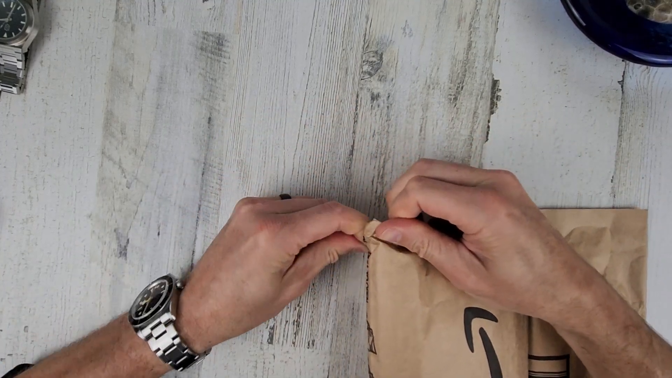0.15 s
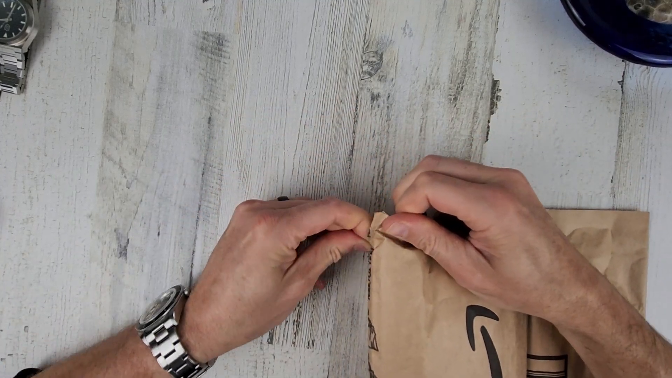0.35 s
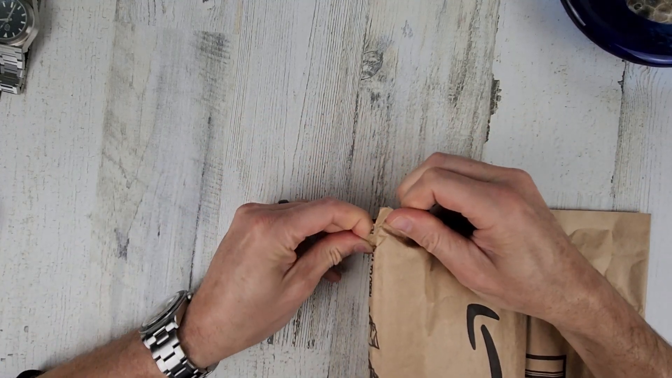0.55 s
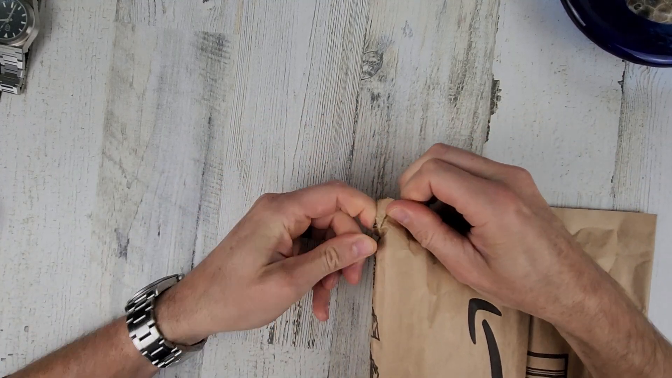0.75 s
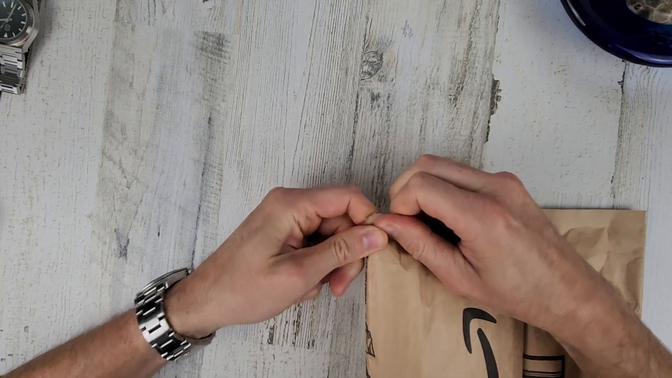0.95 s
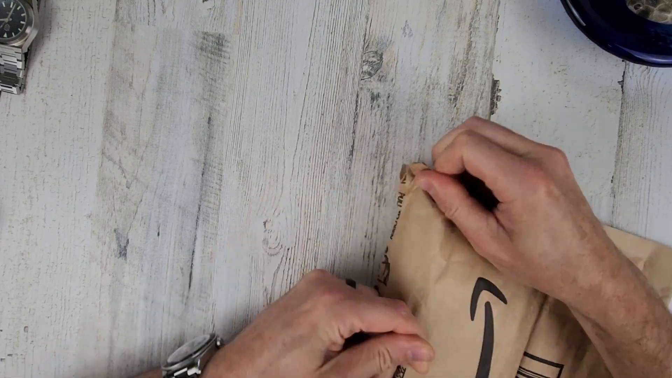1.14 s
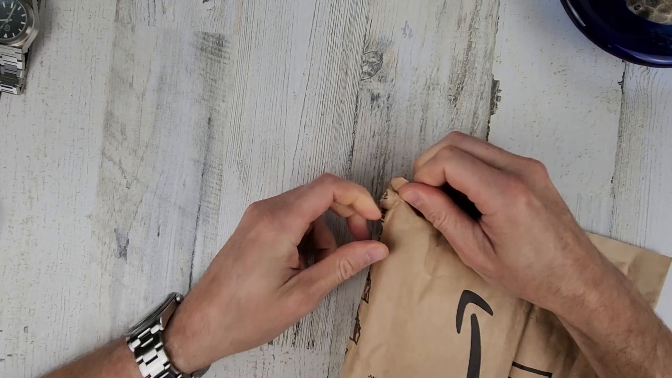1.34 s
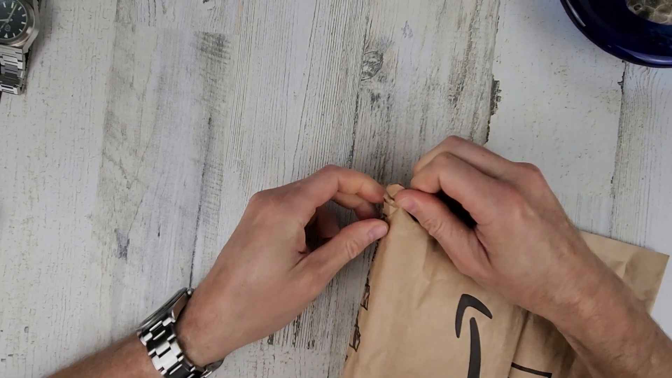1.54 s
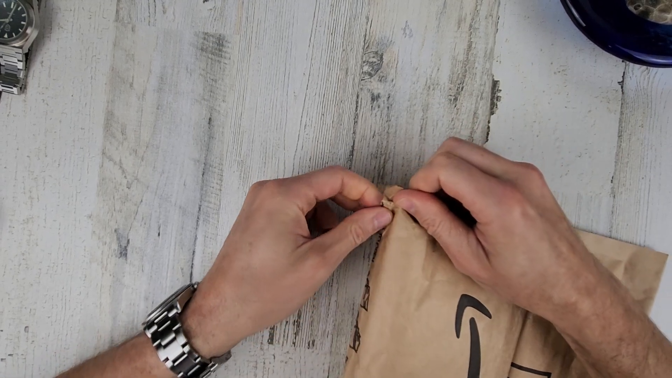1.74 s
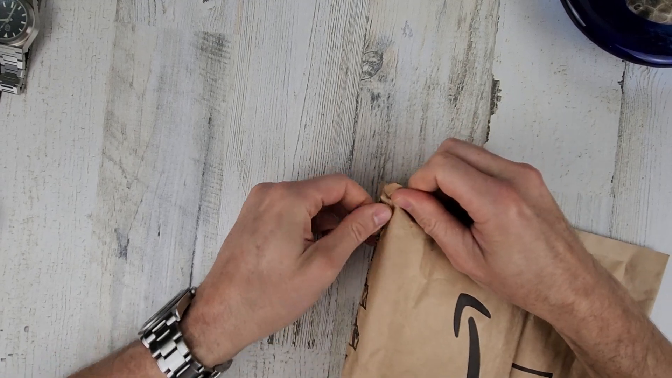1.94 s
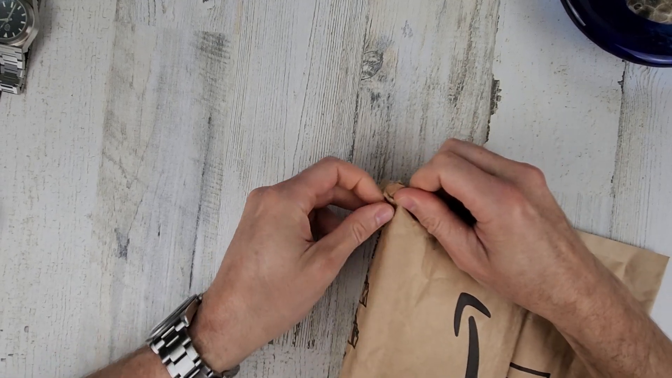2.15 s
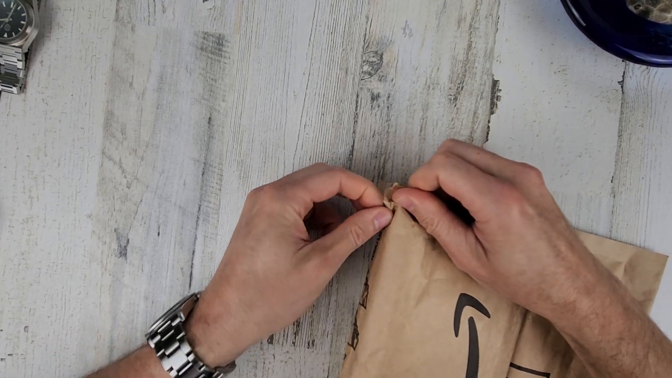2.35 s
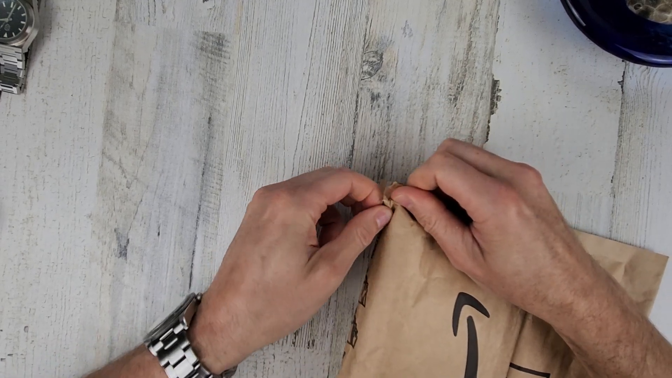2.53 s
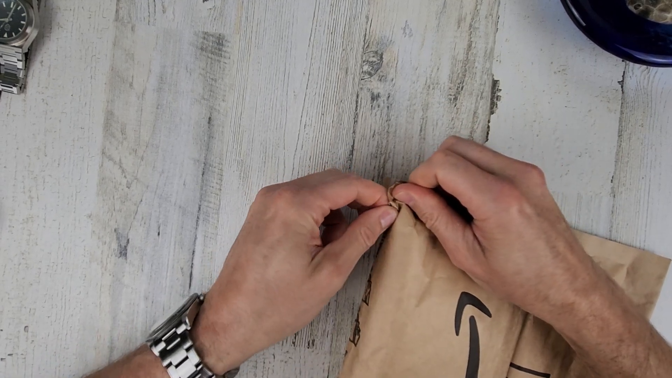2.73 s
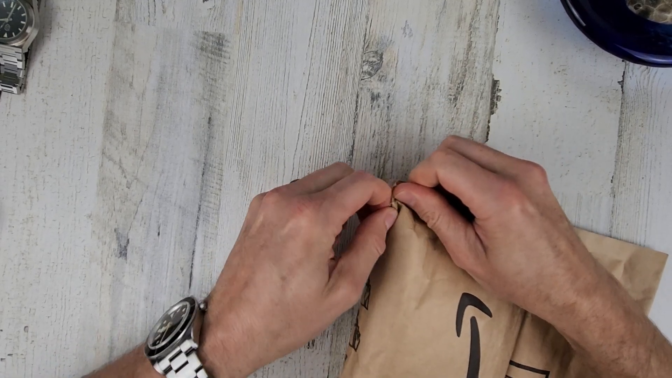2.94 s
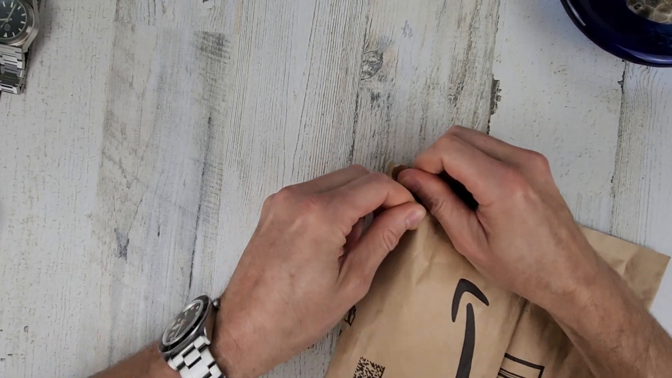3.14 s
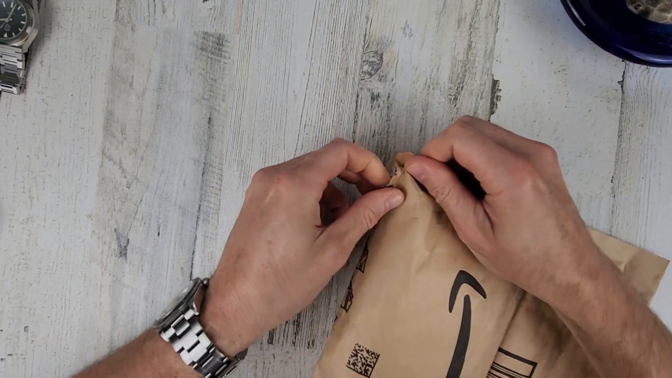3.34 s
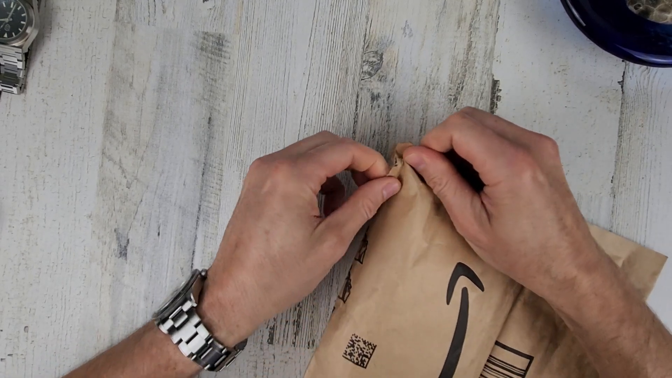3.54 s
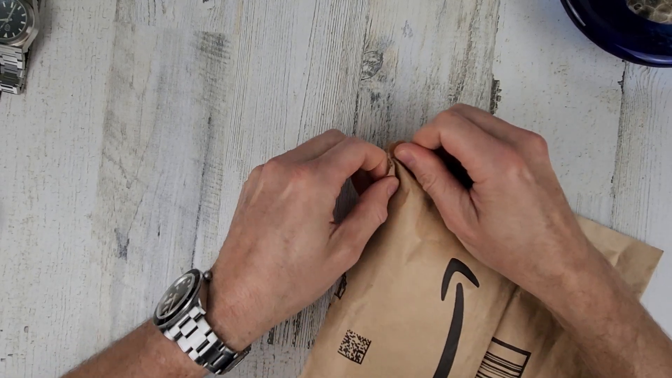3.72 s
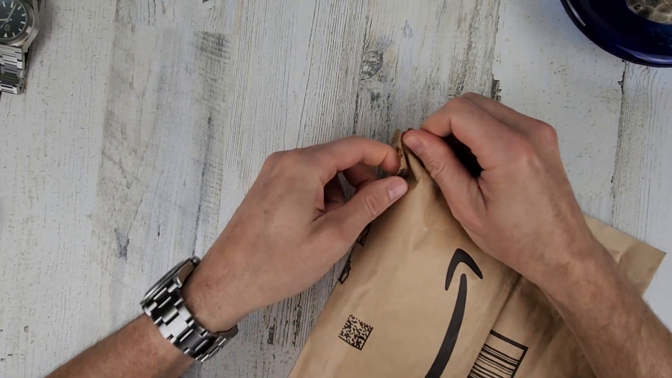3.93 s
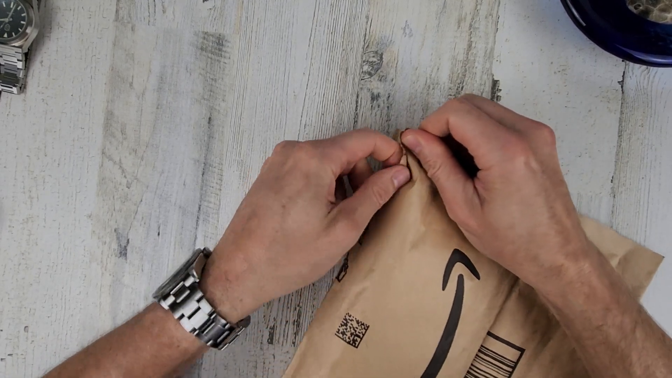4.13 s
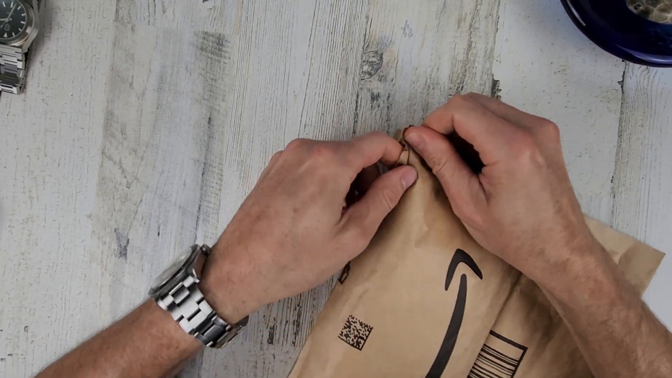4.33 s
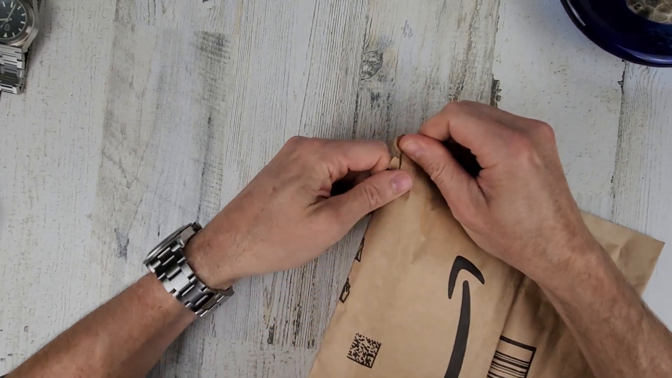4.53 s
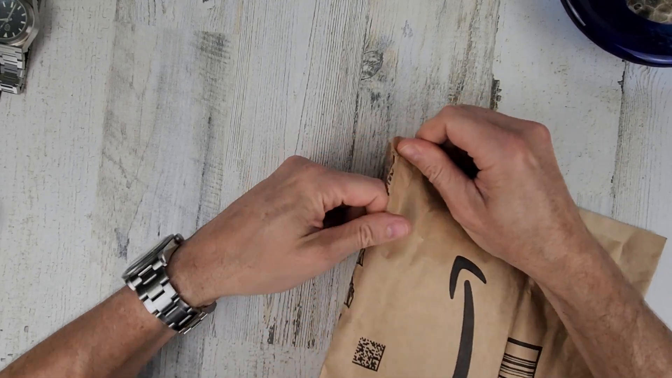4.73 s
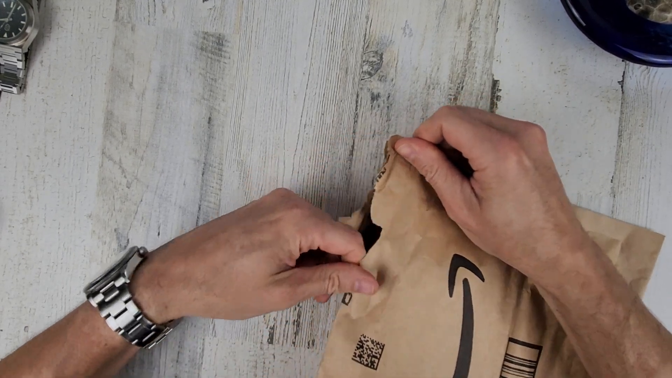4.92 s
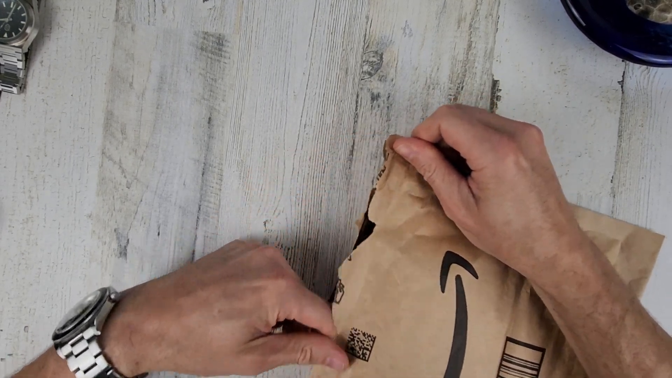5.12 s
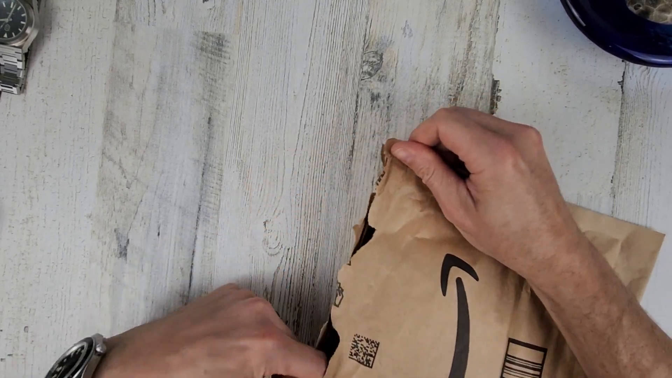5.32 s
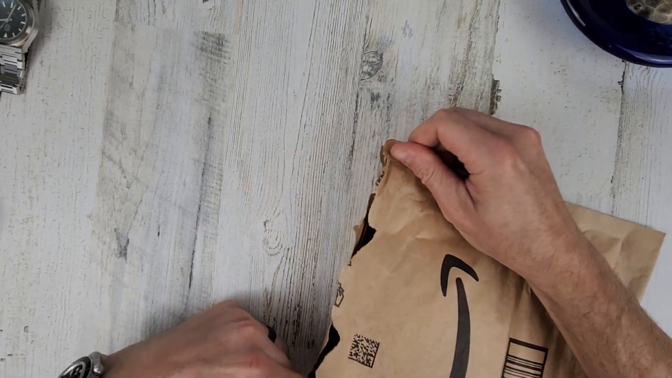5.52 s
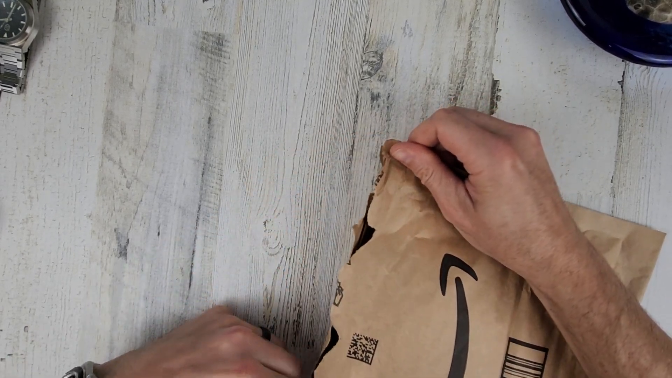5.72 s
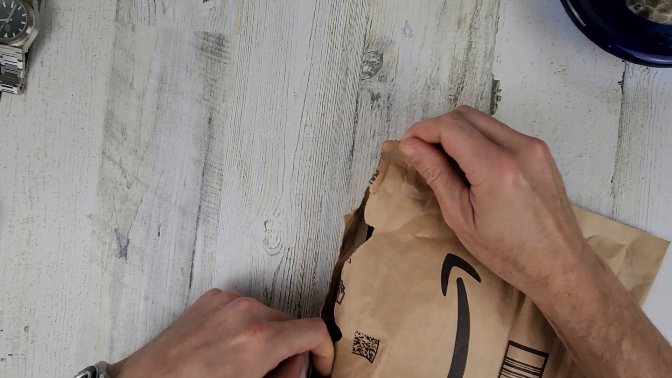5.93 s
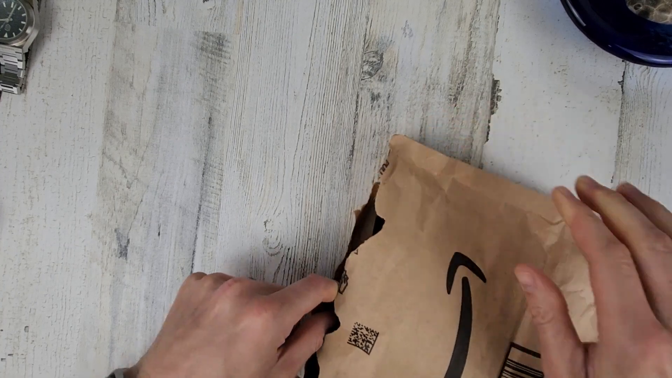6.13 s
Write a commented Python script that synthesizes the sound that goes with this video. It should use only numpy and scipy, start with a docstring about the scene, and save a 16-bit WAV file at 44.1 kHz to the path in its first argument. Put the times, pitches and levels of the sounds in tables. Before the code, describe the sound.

A quiet indoor room with barely audible air noise; close stereo microphone over a table. From 0 to 1 s, fingers softly rub a stiff padded paper mailer, with faint hiss, tiny crinkles and a small tick near 0.5 s. At about 1.06 s a loud, sharp rip bursts out with a low, short table bump, followed to 1.25 s by several bright, hollow pops. From 1.3 to 3 s there is light rustling, with single snaps near 1.45 and 1.96 s and a small flurry to 2.1 s. Near 3.0 s comes a brief tear and soft thud, then rubbing and crisp snaps at 3.34, 3.64 and 4.43 s. From 4.6 to 5.65 s rapid crackling tears and snaps crowd together, strongest around 4.84 and 5.13 s, with dull bumps beneath. They thin out into rustling, and a few last snaps sound around 6 s.

```python
"""In a quiet room, fingers rustle, rub and rip a padded paper mailer: random clicks shaped into hiss and crackle.
Soon taut panels snap over: each is a short ringing tone, a crack of noise and a softer burst of creases.
After a second the bag bumps the table, heard as low fading tones, and longer tears run along its edge.
Rubs, rips, tears and snaps then mix until the end; the hollow bag and a small room ring on after the paper."""
import sys
import numpy as np
from scipy import signal
from scipy.fft import rfft, irfft
from scipy.io import wavfile
from scipy.ndimage import uniform_filter1d

SR = 44100
rng = np.random.default_rng(int(sys.argv[2]) if len(sys.argv) > 2 else 0)


def master(y):
    """Save y as 16-bit WAV."""
    cut = np.clip(np.atleast_2d(y).T, -1, 1)
    pcm = np.round(cut * 32767)  # scale
    wavfile.write(sys.argv[1], SR, pcm.astype(np.int16))


N = 272097
T = np.arange(N) / SR

# steady background of the still room: pitch_hz, relative_level_db (per Hz)
AIR_SPECTRUM = [(20, -3.5), (55, 2.5), (110, -8.5), (250, -10.5), (600, -22), (1200, -11), (3000, -45),
                (8000, -18), (16000, -32)]
# fingers slide over the paper: middle_s, length_s, relative_hiss_db, sheet_over_hiss_db
RUBS = [(0.055, 0.063, -55.5, -2), (0.186, 0.11, -50.5, -1.5), (0.295, 0.08, -51.5, -2.5),
        (0.447, 0.18, -53, -20), (0.683, .12, -48, 2), (0.836, 0.21, -48, -2.5), (0.981, 0.14, -41.5, -5),
        (1.275, 0.23, -44, -3), (1.483, 0.037, -41, -0.5), (1.6, 0.13, -48, -5), (1.673, 0.042, -47, 1),
        (1.791, 0.054, -49, -0.5), (1.97, 0.086, -38.5, -1.5), (2.087, 0.087, -34.5, -4),
        (2.16, .11, -43, -2), (2.327, 0.1, -48.5, 1), (2.473, 0.18, -63, 1.5), (2.612, .1, -46, 1),
        (2.76, 0.054, -57, 1.5), (2.975, .1, -48.5, -1.5), (3.105, 0.099, -38, -1), (3.23, .1, -39, -6),
        (3.342, 0.17, -47, 0), (3.522, .07, -63.5, 8.5), (3.654, 0.068, -47.5, 2), (3.83, 0.24, -51, 2),
        (4.055, 0.069, -42, -6.5), (4.175, 0.066, -37, -3), (4.263, 0.28, -45.5, -3),
        (4.409, 0.1, -38.5, -0.5), (4.539, 0.094, -38.5, -2.5), (4.777, 0.14, -44, 4.5),
        (5.51, 0.31, -42.5, -8.5), (5.917, 0.14, -35, 0.5), (6.026, 0.15, -39, -4.5)]
# runs of fibres give way at once: peak_s, relative_hiss_db, rise_s, fall_s, sheet_over_hiss_db
RIPS = [(.026, -46.5, .002, 0.0046, -13), (.532, -33, .0007, 0.024, -8), (1.063, -8.5, .0034, 0.0038, -8),
        (1.082, -23, 0.011, 0.0083, -3), (1.2434, -16.5, 0.00057, .0045, -1.5),
        (1.964, -26.5, .0032, .0076, -4.5), (2.87, -42.5, .001, 0.0064, -22),
        (4.408, -27.5, .0036, 0.0024, 5), (4.52, -27, .004, .013, -2.5), (4.615, -15, 0.01, 0.013, -3.5),
        (4.843, -18.5, .005, 0.012, 2.5), (4.875, -21, .004, .0044, -4), (4.965, -23, .004, 0.0061, -7),
        (5.105, -19, .003, .014, -2), (5.128, -9.5, 0.0026, 0.0049, -4.5), (5.26, -22.5, .0013, 0.0056, -8),
        (5.363, -16.5, 0.0049, 0.015, -4), (5.467, -23, .005, .014, -16), (5.637, -21, .0007, .005, -4),
        (5.79, -27.5, 0.0019, 0.0043, -3), (6.021, -21, .0025, .007, -5)]
# hiss of the fibres themselves: pitch_hz, relative_level_db (per Hz)
FIBRE_SPECTRUM = [(500, -24), (1500, -6.5), (2600, -1), (4000, -0.5), (5200, 3), (6600, -1), (8000, 1),
                  (10000, -4.5), (11300, -3), (12300, -0.5), (14000, -2), (16000, -4)]
# sound of the sheet shaken by its fibres: pitch_hz, relative_level_db (per Hz)
SHEET_SPECTRUM = [(100, -22), (260, -12), (480, -12.5), (590, -4.5), (800, -5), (1100, -2), (1400, -1.5),
                  (2200, -4.5), (3000, -8), (6000, -18), (16000, -70)]
# resonances of the hollow bag: pitch_hz, width_hz, relative_level_db
BAG_RESONANCES = [(413, 43, 0.5), (590, 59, 0.5), (780, 115, -4.5), (1100, 220, -3), (1576, 14, -4.5),
                  (2250, 70, -2), (3060, 96, -21), (3670, 75, -19)]
# panels that buckle: start_s, relative_level_db, pitch_hz, relative_crack_db
BUCKLES = [(.277, -42.5, 1100, -10), (.291, -37, 1240, -15), (.507, -45, 443, -17), (.529, -39, 1350, -5),
           (.647, -39, 1100, -12), (.6655, -32.5, 1370, -26), (.7, -41.5, 1390, -13),
           (.791, -31.5, 2190, -4), (0.9605, -36.5, 2220, -11), (1.1305, -24, 1810, -6),
           (1.1402, -14, 700, -3.5), (1.152, -18.5, 1840, -20), (1.1858, -23, 724, -18),
           (1.221, -28, 1450, -17), (1.2432, -23.5, 710, -8), (1.2439, -17.5, 2750, -6),
           (1.37, -38, 1100, -6.5), (1.4484, -18.5, 756, -20), (1.9637, -19.5, 594, -13),
           (2.0184, -24, 1540, -17), (2.0472, -25.5, 900, -15), (2.0861, -25.5, 965, -20),
           (2.103, -25.5, 1550, -1), (2.639, -40, 1390, -2.5), (3.024, -30.5, 554, -10),
           (3.087, -22.5, 880, -11), (3.2684, -34, 1070, -8.5), (3.3421, -22.5, 1480, -7.5),
           (3.6398, -16.5, 1006, -10.5), (3.8474, -41, 1050, -16), (3.96, -35, 1036, -28),
           (4.1886, -30.5, 950, 0.5), (4.3239, -37, 4370, 0.5), (4.389, -31, 1740, -4.5),
           (4.4286, -15, 1450, -5), (4.5568, -30, 1090, -2.5), (4.7735, -34, 1870, -26),
           (4.7903, -30, 2190, -10), (4.807, -26.5, 1370, -20), (4.8405, -14.5, 1850, -3),
           (4.8915, -23, 2110, -14), (4.908, -19.5, 2130, -3), (4.9732, -19, 2230, -5.5),
           (5.001, -19, 2150, -22), (5.0535, -25, 950, -12), (5.1275, -11.5, 900, -14),
           (5.136, -17, 1060, -22), (5.154, -17, 1070, -23), (5.2236, -29.5, 1140, -5),
           (5.3269, -16.5, 1054, 0), (5.3635, -14, 1074, -27), (5.4645, -24, 1120, -12),
           (5.5083, -30, 1170, -6), (5.5326, -30, 1090, -10.5), (5.6355, -26, 1610, -14),
           (5.788, -30, 1770, -8), (5.952, -24.5, 1770, -4), (5.9678, -24.5, 1560, -12),
           (6.0193, -25, 1970, 1)]
# the bag bumps on the table: start_s, relative_level_db, reach_hz (modes well above it are hardly stirred)
BUMPS = [(1.057, -25, 120), (1.089, -27, 100), (1.128, -31, 130), (1.234, -43, 89), (1.319, -43, 70),
         (1.52, -46.5, 60), (1.963, -47, 80), (3.017, -32.5, 320), (4.518, -41, 80), (4.612, -39, 130),
         (4.668, -39, 90), (5.12, -28, 110), (5.353, -31.5, 101), (5.584, -43, 100), (5.909, -43, 90),
         (6.029, -36, 110)]
# modes of the table top: pitch_hz, weight (plain gain), decay_s (time to fall to 1/e)
TABLE_MODES = [(56.6, 0.35, 0.046), (91.5, 1.0, 0.022), (129.4, 0.86, 0.018), (159, .8, 0.017),
               (235, 0.24, .009)]
# the edge tears along: start_s, length_s, relative_hiss_db, sheet_over_hiss_db
TEARS = [(1.059, 0.14, -27, -2.5), (3.01, 0.017, -30.5, -5), (4.596, 0.068, -24, 0.5),
         (4.837, 0.12, -22.5, -3.5), (4.96, 0.069, -21.5, -3), (5.047, 0.024, -34, -2.5),
         (5.101, .07, -21, -3), (5.233, 0.071, -27.5, -5.5), (5.433, 0.059, -27.5, -5.5),
         (5.584, .04, -31, -2)]

HOLD_DB, HOLD_SHEET_DB = -69, 6  # faint rustle of holding: relative hiss, and sheet over hiss
RUB_STEEPNESS = 1.96  # how abruptly a slide starts and stops; 2 is a bell
GRIP_DB, GRIP_PER_S = 2.04, 55  # the grip catches and slips: rms depth and new random values per second
RING_CYCLES = 1.16  # cycles a panel takes to fall to 1/e when its relative crack is 0 dB
RING_HALVED_DB = 25  # each such step of harder crack halves those cycles
TEAR_ATTACK_S, TEAR_RELEASE_S = 0.0069, 0.018
TEAR_SAG_DB_PER_S = 42  # the tension eases as the tear runs
TOP_HZ = 15950  # upper edge of the microphone's sound


def undb(db):
    """Turn decibels into a plain gain."""
    return 10 ** (np.asarray(db) / 20)


def unit(x):
    """Scale to an rms of 1."""
    return x / np.sqrt(np.mean(x ** 2))


def add(track, start_s, sound):
    """Mix a sound into a track at a given time."""
    i = max(int(start_s * SR), 0)
    track[..., i:i + sound.shape[-1]] += sound[..., :N - i]


def convolve(x, response):
    """Let every sample of a sound start its own copy of a response."""
    full = signal.fftconvolve(np.atleast_2d(x), np.atleast_2d(response), axes=-1)
    return full[:, :x.shape[-1]]


def colour(x, points, size=2048):
    """Shape the spectrum along (Hz, dB) points with a filter of unit power that never acts ahead of time."""
    hz, db = np.transpose(points)
    grid_hz = np.fft.rfftfreq(size, 1 / SR)
    gain = undb(np.interp(np.log(grid_hz + 1), np.log(hz), db))
    # folding the cepstrum puts all of the response after time zero
    cepstrum = irfft(np.log(gain))[:size // 2]
    cepstrum[1:] *= 2
    response = irfft(np.exp(rfft(cepstrum, size)))
    return convolve(x, response / np.linalg.norm(response))


def band(x, lo_hz, hi_hz):
    """Keep a band of pitches, with gentle edges."""
    edges = [lo_hz, min(hi_hz, SR / 2 - 1)]
    return signal.sosfilt(signal.butter(2, edges, "band", fs=SR, output="sos"), x)


def walk(rate):
    """Wander smoothly between random values, with an rms of 1."""
    size = int(SR / rate)
    steps = np.repeat(rng.standard_normal(N // size + 1), size)[:N]
    return unit(uniform_filter1d(steps, size))


def still_air():
    """The quiet room gives a steady noise, partly shared by both ears."""
    shared = rng.standard_normal(N)
    separate = rng.standard_normal((2, N))
    return colour(shared + 0.54 * separate, AIR_SPECTRUM)


def rub_strokes():
    """Sliding fingers make the friction swell and fade around a middle time."""
    strokes = []
    for middle, length, db, sheet_db in RUBS:
        distance = np.minimum(abs(2 * (T - middle) / length), 10)
        strokes.append((np.exp(-distance ** RUB_STEEPNESS), db, sheet_db))
    return strokes


def rip_strokes():
    """A run of fibres gives way at once, so the level bursts up and dies away."""
    strokes = []
    for peak, db, rise, fall, sheet_db in RIPS:
        fade = np.maximum((peak - T) / rise, (T - peak) / fall)
        strokes.append((np.exp(-np.minimum(fade, 20)), db, sheet_db))
    return strokes


def handling():
    """Holding, rubs, rips and tears add their power, giving the levels of fibre hiss and sheet body."""
    hold = [(1, HOLD_DB, HOLD_SHEET_DB)]
    strokes = hold + rub_strokes() + rip_strokes() + tear_strokes()
    hiss_power = sum((shape * undb(db)) ** 2 for shape, db, _ in strokes)
    body_power = sum((shape * undb(db + sheet_db)) ** 2 for shape, db, sheet_db in strokes)
    grip = undb(GRIP_DB * walk(GRIP_PER_S))
    return grip * np.sqrt(hiss_power), grip * np.sqrt(body_power)


def clicks(rate, spread_db, width):
    """Tiny fractures of uneven size come at random; each has its own left and right balance."""
    chance = np.minimum(rate / SR, 1)
    size = undb(spread_db * np.minimum(rng.standard_exponential(N), 4))
    happens = rng.random(N) < chance
    sign = rng.choice([-1, 1], N)
    # the square root keeps the power even when the rate changes
    train = unit(happens * size * sign / np.sqrt(chance))
    side = width * rng.standard_normal(N)
    return train * np.array([1 + side, 1 - side]) / np.sqrt(1 + width ** 2)


def crinkles(body, rate, spread_db, count=1200):
    """Small creases give way at random, each ringing a few cycles at its own pitch."""
    out, t = np.zeros((2, N)), np.arange(SR // 50) / SR
    when, keep, pitch, size, place = rng.random((count, 5)).T
    start = when * T[-1]
    hz = 800 * 4.0 ** pitch
    gain = np.interp(start, T, body) * undb(spread_db * (size ** 2 - 0.5)) * np.sqrt(hz / 1000)
    for k in np.flatnonzero(keep < rate * T[-1] / count):
        ring = gain[k] * np.sin(2 * np.pi * hz[k] * t) * np.exp(-t * hz[k] / 1.98)
        add(out, start[k], np.outer([1 + place[k], 2 - place[k]], ring))
    return out


def bending(x, depth_db, count=9):
    """The sheet bends as it is pulled, so each part of its spectrum swells and fades on its own."""
    out, rest = 0, x
    for hz in np.geomspace(600, 12000, count):
        low = signal.sosfiltfilt(signal.butter(2, hz, fs=SR, output="sos"), rest)
        out = out + low * undb(depth_db * walk(28))
        rest = rest - low
    return out + rest


def tearing():
    """Fibres rub and part, faster under a harder pull; they hiss themselves and shake the sheet around them."""
    hiss, body = handling()
    effort = (hiss / undb(-40)) ** .15
    fibres = colour(hiss * clicks(14000 * effort, spread_db=4.0, width=0.93), FIBRE_SPECTRUM)
    sheet = colour(body * clicks(4000 * effort, spread_db=3.5, width=0.31), SHEET_SPECTRUM)
    # a light touch only slides over the creases, a hard pull breaks them
    strain = np.minimum(body / undb(-30), 1) ** .2
    creases = crinkles(body * strain, rate=130, spread_db=11)
    # the bag flexes with a low rumble
    flex = (hiss * body) ** 0.43 * unit(band(rng.standard_normal(N), 42, 125))
    crackle = bending(undb(-0.44) * fibres + undb(-2.5) * sheet, depth_db=2.5)
    return crackle + undb(3.0) * creases + undb(-29) * flex


def hollow(x):
    """The air pocket and the walls of the bag ring on after each crackle."""
    t = np.arange(SR // 10) / SR
    ring = 0
    for hz, width, db in BAG_RESONANCES:
        strength = undb(db) * 2 * np.pi * width / SR
        ring = ring + strength * np.exp(-np.pi * width * t) * np.cos(2 * np.pi * hz * t)
    return undb(-2.5) * (x + 0.75 * convolve(x, ring))


def room(x):
    """Hands and creases scatter the short waves at once; then comes the short tail of a furnished room."""
    t = np.arange(SR // 2) / SR
    out = x
    # delay s, time to fall by 60 dB s, level dB, lowest Hz, highest Hz, stereo width
    layers = [(.0015, .04, -8, 1860, 11300, 1), (.006, .22, -19, 280, 9000, 0.87)]
    for delay, t60, db, lo_hz, top_hz, width in layers:
        mid, side = rng.standard_normal((2, len(t)))
        noise = band(np.array([mid + width * side, mid - width * side]), lo_hz, top_hz)
        echoes = noise * (t > delay) * np.exp(-np.log(1000) * t / t60)
        out = out + undb(db) * convolve(x, unit(echoes) / np.sqrt(len(t)))
    return out


def buckling():
    """A panel flips: a sharp crack, a few cycles of its own bending modes, and a burst of creases settling."""
    out, t = np.zeros((2, N)), np.arange(SR // 16) / SR
    for start, db, hz, crack_db in BUCKLES:
        cycles = np.clip(RING_CYCLES * 2 ** (-crack_db / RING_HALVED_DB), .5, 10)
        ring = np.sin(2 * np.pi * hz * t) * np.exp(-t * hz / cycles)
        for ratio, gain in [(.65, 0.2), (1.75, 0.69), (2.7, 0.66)]:
            mode_hz = hz * ratio * (1 + 0.11 * rng.standard_normal())
            mode = np.sin(2 * np.pi * mode_hz * t) * np.exp(-t * mode_hz / 1.34)
            ring = ring + gain * rng.choice([-1, 1]) * mode
        # slacker panels, which ring for more cycles, flip more slowly
        onset = 1 - np.exp(-t / (0.000081 * cycles))
        ring = band(ring * onset, 0.63 * hz, 7400)
        noise = rng.standard_normal(len(t)) + 0.7 * rng.standard_normal((2, len(t)))
        crack = band(noise, 2180, 7300) * (np.exp(-t / 0.001) + 0.16 * np.exp(-t / 0.0051))
        creases = band(rng.standard_normal(len(t)), 0.58 * hz, 1.96 * hz) * np.exp(-t / 0.0068)
        snap = unit(ring) + .5 * unit(creases) + undb(crack_db + 4.0) * unit(crack)
        add(out, start, undb(db - 14.5) * snap)
    return out


def tear_strokes():
    """A tear catches, runs with easing tension and lets go."""
    strokes = []
    for start, length, db, sheet_db in TEARS:
        before = np.maximum(start - T, 0) / TEAR_ATTACK_S
        after = np.maximum(T - start - length, 0) / TEAR_RELEASE_S
        sag = undb(-TEAR_SAG_DB_PER_S * np.clip(T - start, 0, length))
        strokes.append((sag * np.exp(-np.minimum(before + after, 20)), db, sheet_db))
    return strokes


def bumps():
    """Contacts stir the low modes of the table top; those of low reach stir only the lowest."""
    out, t = np.zeros(N), np.arange(SR // 5) / SR
    for start, db, reach_hz in BUMPS:
        modes = 0
        for hz, weight, decay in TABLE_MODES:
            stirred = weight * np.exp(-(hz / reach_hz) ** 2)
            tone = np.sin(2 * np.pi * (hz * t + rng.random()))
            modes = modes + stirred * tone * np.exp(-t / decay)
        onset = 1 - np.exp(-t / 0.0034)
        add(out, start, undb(db - 17) * unit(modes * onset))
    return out


def scene():
    """The paper sounds through bag and room; the table bumps and the still air are added directly."""
    paper = room(hollow(tearing() + buckling()))
    return paper + bumps() + undb(-68.5) * still_air()


def record(dry, count=2):
    """A stereo microphone: the right port hears count samples later and brighter; peaks stop at full scale."""
    left = dry[0] * undb(1.5)
    right = np.pad(dry[1], (count, 0))[:N] * undb(1.2)
    left_port = left - 0.14 * band(left, 11500, 14000)
    right_port = right + .5 * band(right, 10800, 14800)
    limited = np.clip(np.array([left_port, right_port]), -1, 1)
    return signal.sosfilt(signal.ellip(10, .1, 80, TOP_HZ, fs=SR, output="sos"), limited)


dry = scene()
out = record(dry)
master(out)
```